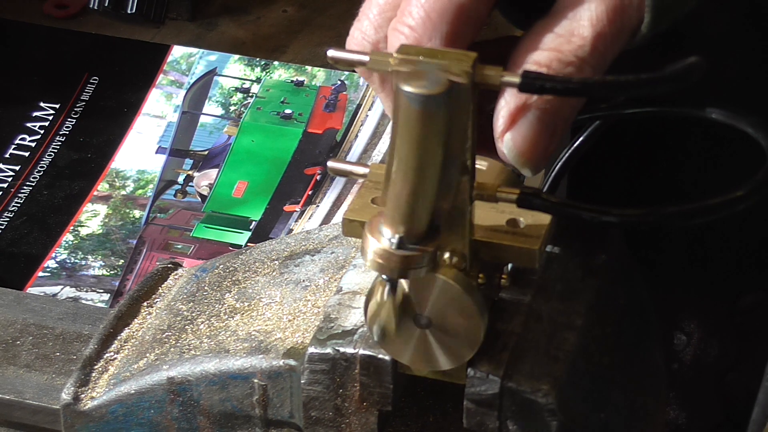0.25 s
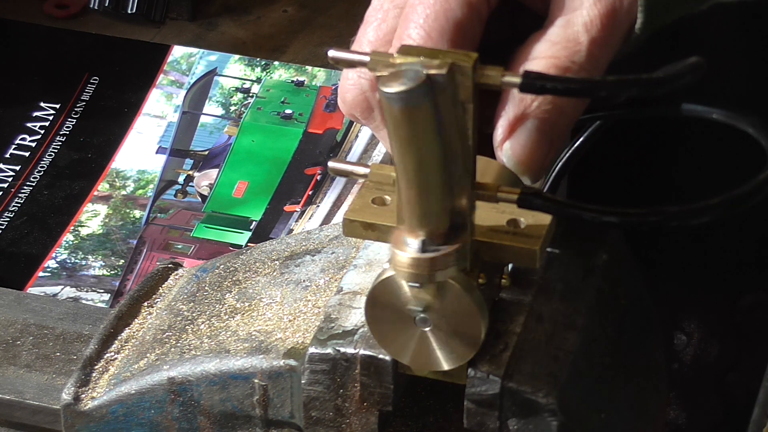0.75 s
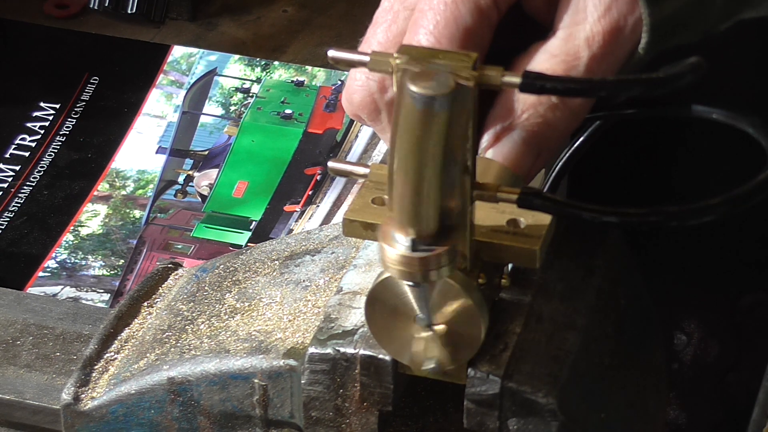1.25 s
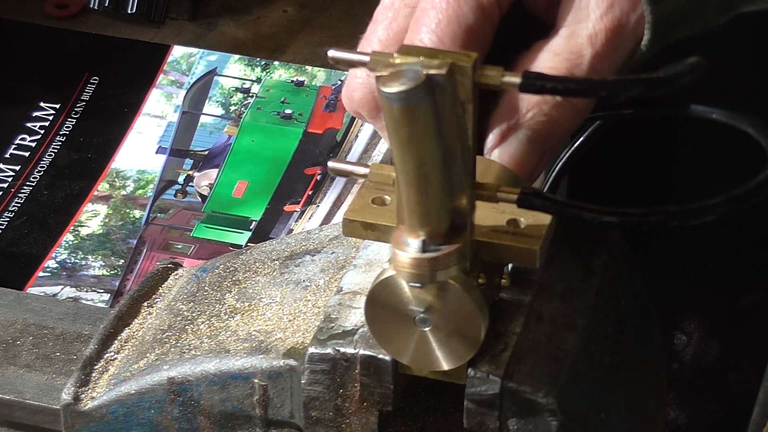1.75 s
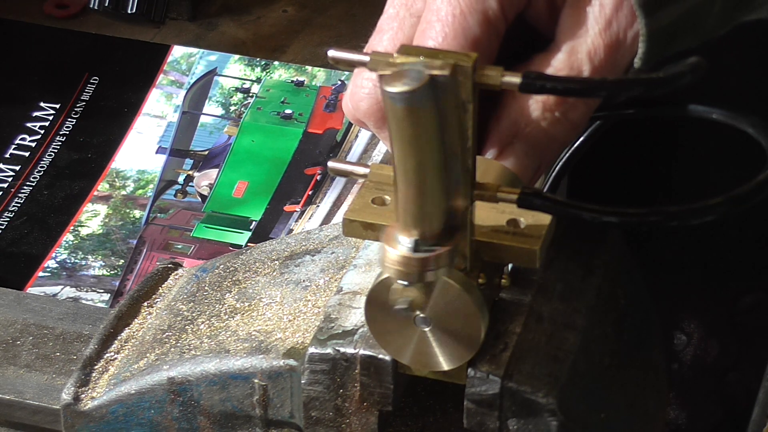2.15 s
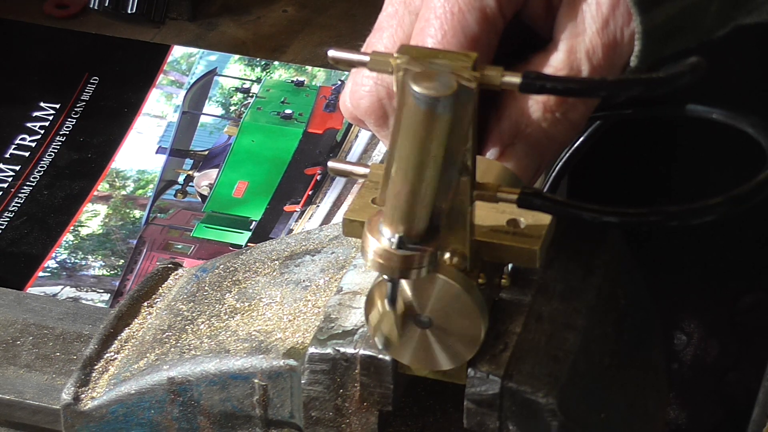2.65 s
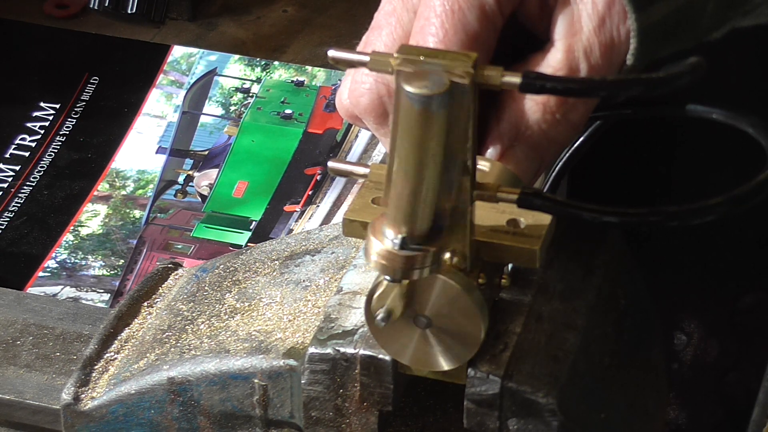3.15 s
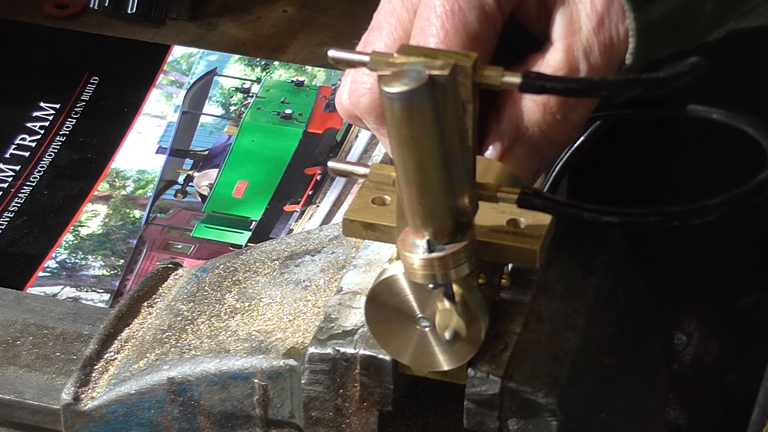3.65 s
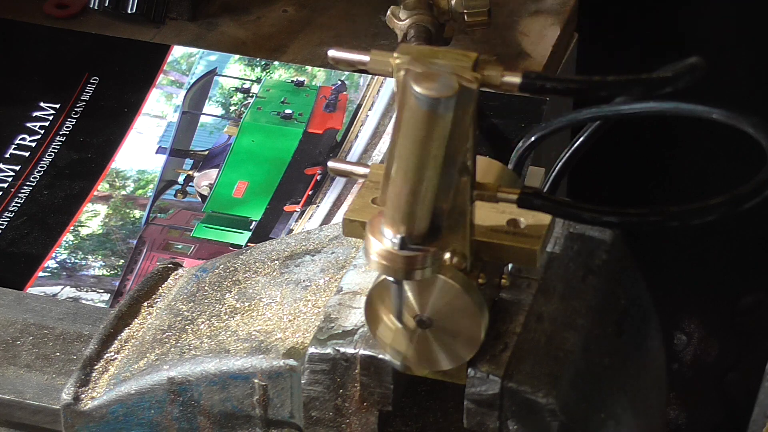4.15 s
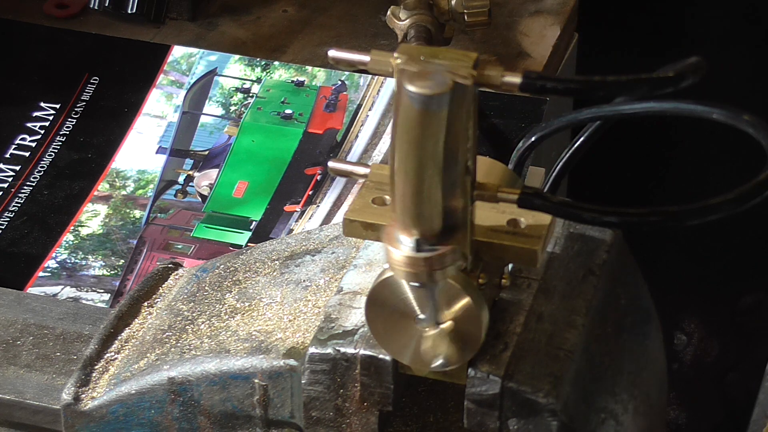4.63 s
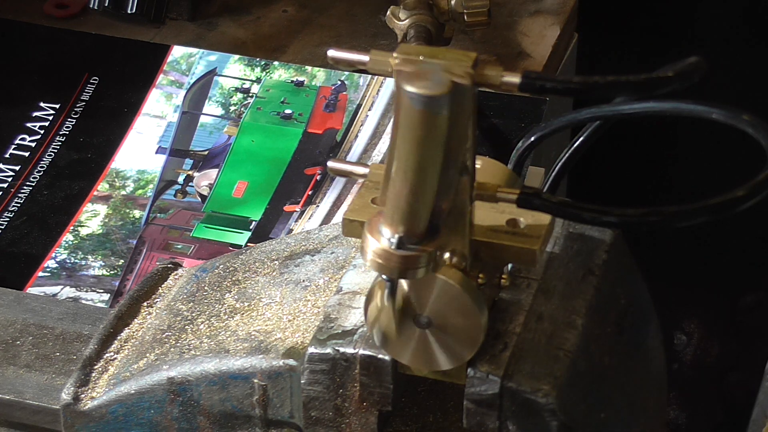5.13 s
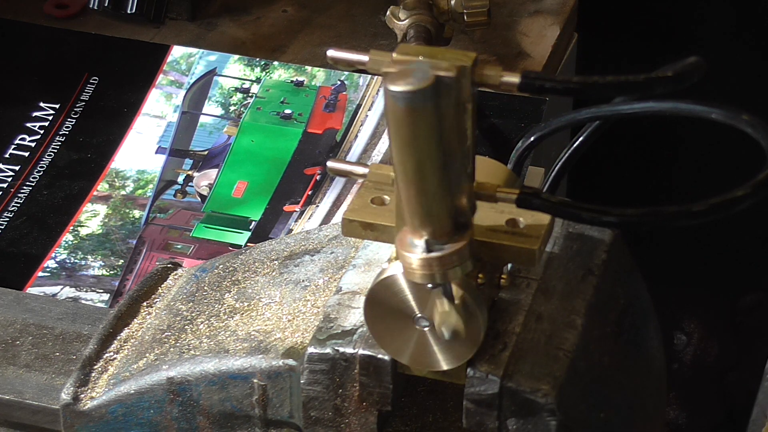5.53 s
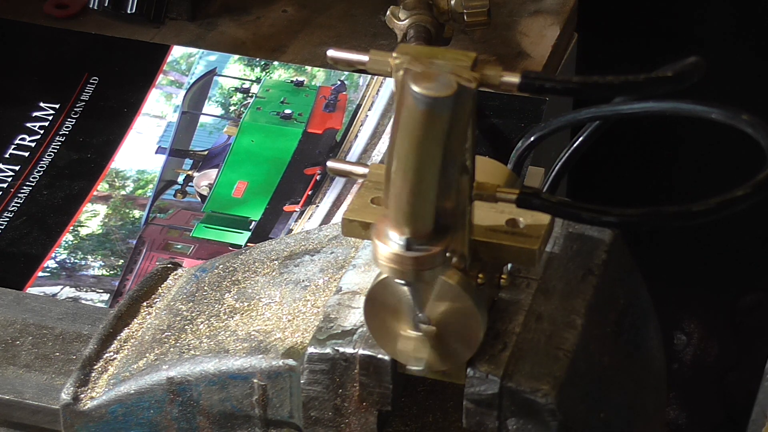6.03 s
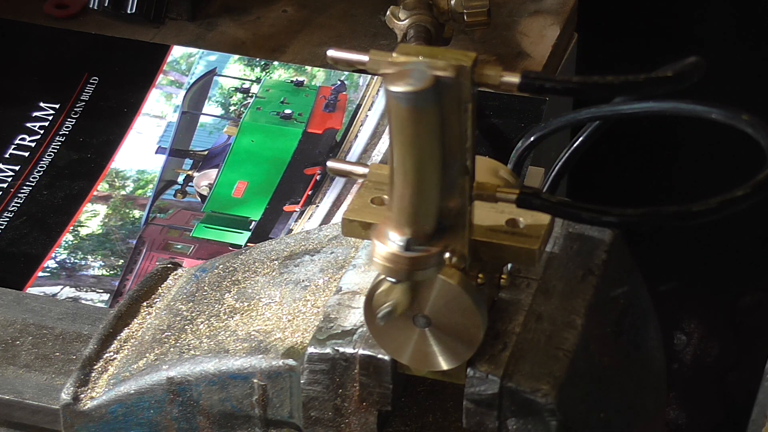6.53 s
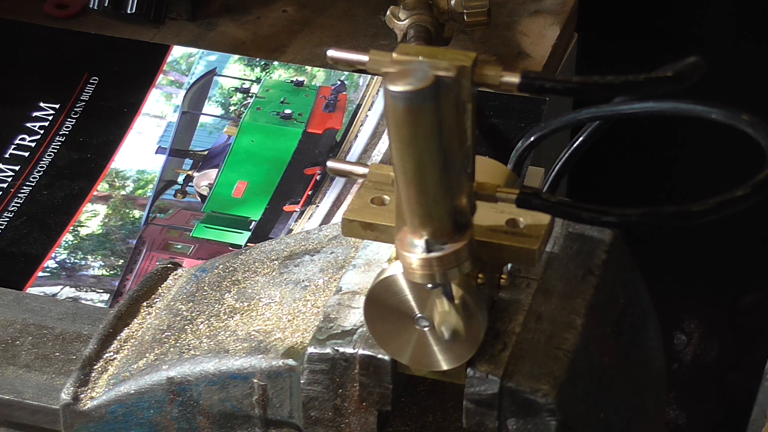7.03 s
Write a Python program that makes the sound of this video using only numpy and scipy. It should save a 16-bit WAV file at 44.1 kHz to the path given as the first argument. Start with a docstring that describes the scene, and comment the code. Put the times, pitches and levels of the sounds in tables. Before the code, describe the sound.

A small brass engine runs on compressed air, heard closely in stereo on a workbench. From 0 s it turns about twenty-one times a second, two sharp hissing chuffs per turn merging into a rapid, raspy flutter over low vice and bench knocks. Loose metal rattles and thin wheezes follow the cycle. A harder spit comes near 0.6 s, and one bright metal click with tiny bounces at 0.8 s. Speed wavers slightly around 1.5 s. From about 2.1 s a hand slows it; the pitch sinks, puffs separate and grow stronger, with ticks, hollow knocks, dull thumps and a soft leaking hiss. By 3.8 s it chugs at half speed. Around 4.0 to 4.2 s it surges back, the rattle easing by 5 s, then runs evenly until the end near 7.3 s, with faint spits around 6.5 and 7.1 s. The room tail is short and the background nearly silent.

```python
"""Small steam engine on a bench

A small double-acting brass steam engine runs on compressed air, clamped in a vice on a workbench.
Each turn gives two chuffs of shaped noise, and a few knocks that ring the resonances of the bench.
A hand slows the engine until it chugs at half speed, then lets it run free again; metal clicks once.
Rattles, ticks, wheezes and hollow tones follow the crank; a short room tail and faint noise surround them."""
import sys
import numpy as np
from scipy import signal
from scipy.fft import rfft, irfft, next_fast_len
from scipy.io import wavfile
from scipy.ndimage import uniform_filter1d, map_coordinates

SR = 44100
rng = np.random.default_rng(int(sys.argv[2]) if len(sys.argv) > 2 else 0)


def unload_audio(sound):
    """Save the sound as a 16-bit wav file, at the path given as the first command line argument."""
    columns = np.transpose(np.atleast_2d(sound))
    # keep every value between -1 and 1, then stretch to whole-number steps
    steps = np.round(np.clip(columns, -1, 1) * 32767)
    wavfile.write(sys.argv[1], SR, steps.astype(np.int16))


N = 321180

# Speed of the crankshaft. Each row: time in seconds, speed in turns a second.
SPEED = [(0.0, 21.762), (0.42, 21.743), (0.5, 20.698), (0.67, 21.928), (1.46, 20.449), (1.65, 21.124),
         (2.03, 21.02), (2.4, 16.955), (2.93, 14.692), (3.1, 13.066), (3.38, 11.573), (3.84, 10.441),
         (3.98, 11.298), (4.04, 15.24), (4.15, 20.328), (4.35, 21.26), (4.65, 21.349), (7.28, 21.317)]
# Air let out in every turn: two chuffs, and the hiss that follows each. Each row: crank angle in turns,
# hiss level in dB, fizz level in dB, opening in turns, decay in seconds, change towards standstill in dB.
PUFFS = [(-.005, -26.5, -30.5, 0.029, 0.0025, 12.5), (.1, -35.5, -63, 0.05, 0.01, -8),
         (0.483, -25.5, -47, 0.024, 0.0066, 9.5), (0.65, -34.5, -60, 0.12, 0.022, -3.5)]
# Colour of the chuffs. Each row: frequency in Hz, level in dB.
HISS = [(300, -28), (1000, -17), (2000, -8.5), (2600, -20), (3300, -15), (4000, -9.5), (5200, -8),
        (6600, -8.5), (7700, -2.5), (8600, 3), (9400, -9), (10800, -16), (13000, -10), (16000, -6.5)]
# Colour of the thin top of the chuffs. Each row: frequency in Hz, level in dB.
FIZZ = [(7000, -62), (11000, -20.5), (13000, 12), (13800, 20), (14800, 17), (15600, 8), (16500, -12.5)]
# The part of the chuffs that differs between the microphones. Each row: frequency in Hz, level in dB.
SCATTER = [(3000, -78), (6000, -72), (8500, -13.5), (11000, 2), (14000, -20)]
# Air pushed through the narrow port at mid-stroke. Each row: crank angle in turns, half length in turns,
# level at 1.5 times the usual speed in dB, change towards standstill in dB.
WHEEZES = [(.235, 0.045, -33.5, -26), (.795, 0.061, -29, -13.5)]
# Colour of that air. Each row: frequency in Hz, level in dB.
WHEEZE = [(2000, -30), (5000, 8.5), (8000, -44), (11000, -24), (13000, -16), (14500, 16.5), (15600, 4),
          (16500, -10)]
# Knocks in every turn. Each row: crank angle in turns, relative level in dB,
# power of the speed that the force follows.
KNOCKS = [(0.017, -5.5, 0.85), (0.16, -6.5, -0.27), (0.518, -9, -.9), (0.632, -2, 0.5),
          (0.843, -7, -0.0039)]
# Resonances of vice and bench. Each row: frequency in Hz, width in Hz, relative level in dB.
BENCH = [(84.8, 2, -11.5), (117.2, 15.8, -11.5), (163, 37.5, -6.5), (179.7, 9, -0.5), (216.1, 14, -5.5),
         (263.5, 22.4, -6), (290.4, 10.3, -7.5), (350, 18, -3.5), (358.3, 67.7, -6.5), (388.5, 24.3, -6),
         (481.6, 13, -18), (612, 25, -21.5), (771, 48, -22.5), (832, 5.7, -13.5), (917.7, 18, -16),
         (1030, 37, -35), (1130.4, 13, -20.5), (1338, 21, -30.5)]
# Sound of the bench that differs between the microphones. Each row: frequency in Hz, level in dB.
SPREAD = [(130, -19), (200, -51), (300, -16.5), (600, -9.5), (1200, -18)]
# Play in the crank pin, taken up after each chuff; loose metal rattles at the same angles.
# Each row: crank angle in turns, relative level of the tick in dB.
TICKS = [(0.092, 7), (.585, 3.5)]
# Colour of the ticks. Each row: frequency in Hz, level in dB.
TICK = [(500, -17), (1400, -12), (2000, 0), (2700, -13), (4500, -11), (6500, -4.5), (8300, 13.5),
        (9500, -3), (13000, -12), (16000, -9)]
# Colour of the loose metal. Each row: frequency in Hz, level in dB.
RATTLE = [(150, -26), (350, 4.5), (470, 0.5), (605, 3.5), (700, 0), (920, 2), (1050, -0.5), (1200, 0),
          (1500, -6.5), (2200, -19), (3000, -15)]
# Chatter of the piston rod. Each row: crank angle in turns, level in free running in dB,
# extra under the hand in dB.
CHATTER = [(.15, -50, 5.5), (.72, -50.5, 3)]
# Colour of the chatter. Each row: frequency in Hz, level in dB.
CLATTER = [(1000, -20), (1600, -27), (2050, 13), (2600, -5), (3300, 5), (4200, 5.5), (6000, -18),
           (9000, -36)]
# Hollow tones of the cylinder and its brass parts, once a turn; the moving piston bends some of them.
# Each row: start in seconds, end in seconds, crank angle in turns, half length in seconds,
# frequency in Hz, glide in Hz per second, relative level in dB.
RINGS = [(0, .9, .7, .011, 770, 0, -43), (0.45, 2.3, .8, .009, 605, 1000, -42),
         (2.15, 2.8, .04, .012, 918, 0, -38), (2.15, 2.8, .7, .005, 890, 0, -38),
         (2.2, 2.85, .05, .012, 275, 0, -37), (2.3, 2.85, .72, .009, 605, 0, -39),
         (2.85, 3.27, .57, .006, 870, 0, -40), (2.85, 3.27, .67, .006, 720, 0, -39),
         (2.8, 3.27, .87, .009, 610, 0, -39), (2.85, 3.65, .14, .005, 860, 0, -39),
         (3.25, 4.2, .27, .012, 605, 0, -42), (3.27, 4.0, .64, .011, 1163, 0, -39),
         (3.27, 4.0, .61, .006, 850, 0, -39), (3.3, 3.85, .87, .006, 840, 0, -40),
         (2.85, 4.4, .68, .008, 605, 0, -41.5), (3.3, 4.05, .21, .011, 270, 9000, -36.5),
         (3.3, 4.05, .34, .01, 320, -8000, -35), (2.85, 3.3, .25, .009, 270, 5000, -38),
         (2.85, 4.05, .68, .009, 240, 4000, -38.5), (4.05, 4.45, .7, .012, 915, 0, -40),
         (4.05, 4.45, .2, .012, 890, 0, -42)]
# Chuffs that spit harder than the rest. Each row: time in seconds, relative level in dB.
SPITS = [(0.627, -17), (2.6042, -26), (2.6972, -22), (2.759, -25), (2.925, -29), (2.9632, -24),
         (3.108, -26), (3.3506, -24), (3.5244, -24), (6.539, -28), (7.145, -23)]
# A metal click and its bounces. Each row: time in seconds, relative level in dB.
CLICKS = [(0.7726, 1), (0.778, -24), (0.7846, -10)]
# Colour of the click. Each row: frequency in Hz, level in dB.
SNAP = [(200, -23), (600, -6), (1000, -3), (1250, 7), (1900, 4), (2600, -7), (3500, -9), (4500, 3),
        (5800, 6.5), (8000, -10), (16000, -35)]
# Heavy strokes of the engine that thump the bench. Each row: time in seconds, relative level in dB.
THUMPS = [(2.115, -36), (2.161, -32), (2.215, -38), (2.364, -30.5), (2.502, -32), (2.562, -30),
          (2.625, -32), (2.689, -32.5), (2.753, -38), (3.021, -33), (3.279, -33.5), (3.36, -33.5),
          (3.719, -34.4), (3.812, -35), (3.867, -32), (3.907, -38), (4.158, -41), (4.202, -36)]
# How fast the workshop falls silent. Each row: frequency in Hz, time to fall by 60 dB in seconds.
ROOM = [(200, 0.053), (2000, 0.23), (8000, 0.14), (15000, 0.12)]
# Colour of the background noise. Each row: frequency in Hz, level in dB.
FLOOR = [(25, -38), (60, 2), (130, 12), (450, 8), (1000, 11), (2700, -41), (8500, -28), (11000, -33),
         (16000, -51)]
# Colour of the microphones. Each row: frequency in Hz, left minus right in dB.
LEAN = [(130, -.6), (290, -1.4), (640, .9), (3000, .7), (7000, -.3), (9000, -.5), (14000, 2.1)]

HAND_OFF_S, SETTLE_S = 4.19, 0.81  # the hand lets go, then its effect fades over this long
LABOUR_SAG = 0.13  # share of speed lost at which the engine labours fully
# loose metal: level in free running, rise under full labour, extra while the hand is on (dB)
RATTLE_DB, RATTLE_LABOUR_DB, RATTLE_HAND_DB = -47, 2.5, 5
RATTLE_FRESH_DB = -1  # part that changes from blow to blow, against the part that repeats
# the knocks come early or late: in free running, and extra from the fingers (s)
FREE_WANDER_S, GRIP_WANDER_S = 0.0001, 0.00024
RING_DETUNE, PORT_DRIFT = 0.022, 0.025  # shifts in pitch of hollow tones and port hiss (shares)
# both ports are covered before each chuff: angle and half length (turns), drop of the hiss (dB)
SHUT_ANGLE, SHUT_TURNS, SHUT_DB = 0.42, 0.045, -4


def amp(db):
    """Turn decibels into a gain."""
    return 10 ** (np.asarray(db) / 20)


def unit(x):
    """Scale to an average (rms) strength of 1."""
    return x / np.sqrt(np.mean(x ** 2) + 1e-20)


def along(points, hz):
    """Read a curve of (Hz, value) points, joined by lines on a log frequency axis."""
    f, v = np.transpose(points)
    return np.interp(np.log(hz + 1), np.log(f + 1), v)


def filtered(x, response):
    """Weigh the frequencies of x by a response."""
    m = next_fast_len(N + SR // 2)
    return irfft(rfft(x, m) * response(np.fft.rfftfreq(m, 1 / SR)), m)[..., :N]


def low_pass(x, top_hz):
    """Let through what lies below a frequency, with a steep slope above it."""
    return filtered(x, lambda hz: 1 / (1 + (hz / top_hz) ** 10))


def noise(spectrum):
    """Make coloured noise of rms 1."""
    return unit(filtered(rng.standard_normal(N), lambda hz: amp(along(spectrum, hz))))


def impulses(times, sizes):
    """Place single pushes at the given times."""
    inside = (times >= 0) & (times < (N - 1) / SR)
    return np.bincount((times[inside] * SR).astype(int), sizes[inside], N)


def struck(pushes, spectrum, size=2048):
    """Turn each push into a short ring of a given colour that starts at once, with unit energy."""
    cepstrum = irfft(np.log(amp(along(spectrum, np.fft.rfftfreq(size, 1 / SR)))))
    # folding the cepstrum leaves no sound ahead of the push
    cepstrum[1:size // 2] *= 2
    cepstrum[size // 2 + 1:] = 0
    ring = irfft(np.exp(rfft(cepstrum)))
    return signal.oaconvolve(pushes, ring / np.linalg.norm(ring))[:N]


def swell_shape(rise, decay):
    """A tenth of a second that swells and dies away, with a peak of 1."""
    t = np.arange(SR // 10) / SR
    shape = (1 - np.exp(-(t / rise) ** 2)) * np.exp(-t / decay)
    return shape / shape.max()


def bursts(pushes, rise, decay):
    """Turn each push into a swell that dies away."""
    return signal.oaconvolve(pushes, swell_shape(rise, decay))[:N]


def wobble(rate):
    """A smooth random curve with this many random points a second."""
    return map_coordinates(rng.standard_normal(4000), [np.arange(N) * rate / SR], mode='mirror')


def crank():
    """Speed in turns a second, turns made so far, and pace as a share of the usual speed."""
    s, turns_a_second = np.transpose(SPEED)
    speed = np.interp(np.arange(N) / SR, s, turns_a_second)
    return speed, np.cumsum(speed) / SR, speed / np.median(speed)


def passes(angle, scatter_db, jitter):
    """Times when the crank passes an angle (jitter in s), the pace then, and a random strength."""
    _, turns, pace = crank()
    clock = np.arange(N) / SR
    times = np.interp(np.arange(int(turns[-1]) + 1) + angle, turns, clock)
    late, strong = rng.standard_normal((len(times), 2)).T
    pace_then = np.interp(times, clock, pace)
    return times + jitter * late, pace_then, amp(scatter_db * strong)


def hand():
    """1 while the hand is on the engine, settling to 0 after release."""
    return np.clip(1 - (np.arange(N) / SR - HAND_OFF_S) / SETTLE_S, 0, 1)


def labour():
    """0 in free running, 1 once the engine is held well below its usual speed."""
    _, _, pace = crank()
    return np.clip((1 - pace) / LABOUR_SAG, 0, 1)


def drifting(x):
    """Shift the resonances of a noise up and down by reading it a little faster or slower."""
    return map_coordinates(x, [np.arange(N) + np.cumsum(PORT_DRIFT * wobble(45))], order=5, mode='mirror')


def exhaust(scatter_db=0.6, flutter_db=1.55, split_hz=6800, colour_db=1.1, soften_db=-5.5):
    """The rocking cylinder uncovers a port and blows down; slow strokes fill it more and chuff harder."""
    speed, turns, pace = crank()
    hiss_power, fizz_power = np.zeros(N), np.zeros(N)
    for angle, hiss_db, fizz_db, opening, decay, slow_db in PUFFS:
        stroke, since = np.divmod(turns - angle + 1, 1)
        chance_db = scatter_db * rng.standard_normal(200)[stroke.astype(int)]
        strength = amp(chance_db + slow_db * (0.5 - pace))
        # the port opens with the crank angle, the pressure falls with time
        swell = strength * (1 - np.exp(-(since / opening) ** 2)) * np.exp(-since / speed / decay)
        swell /= np.percentile(swell, 99)
        hiss_power += (amp(hiss_db) * swell) ** 2
        fizz_power += (amp(fizz_db) * swell) ** 2
    # the oily jet sputters within each chuff
    sputter = amp(flutter_db * unit(uniform_filter1d(rng.standard_normal(N), size=30)))
    # the lower part of the hiss varies and softens at low speed
    body = amp(colour_db * wobble(40) + soften_db * (1 - pace))

    def jet():
        air = drifting(noise(HISS))
        tinted = air + (body - 1) * low_pass(air, split_hz)
        return sputter * (np.sqrt(hiss_power) * tinted + np.sqrt(fizz_power) * noise(FIZZ))

    mid = jet()
    side = filtered(jet(), lambda hz: amp(along(SCATTER, hz)))
    return np.array([mid + side, mid - side])


def wheeze(scatter_db=1.5):
    """The piston drives the spent air out in a thin swell, stronger the faster it runs."""
    _, turns, pace = crank()
    swell = np.zeros(N)
    for angle, length, db, slow_db in WHEEZES:
        away = (turns - angle + 0.5) % 1 - 0.5
        swell += amp(db + slow_db * (1.5 - pace)) * np.exp(-(away / length) ** 2 / 2)
    air = noise(WHEEZE) + 0.12 * np.array([noise(WHEEZE), noise(WHEEZE)])
    return swell * amp(scatter_db * wobble(30)) * air


def shut():
    """Gain of the escaping air: it dips twice a turn, while the cylinder covers both ports."""
    _, turns, _ = crank()
    away = (turns - SHUT_ANGLE + 1 / 4) % 0.5 - 1 / 4
    return amp(SHUT_DB * np.exp(-(away / SHUT_TURNS) ** 2))


def looseness():
    """Gain of the rattle: stronger under the hand and under labour."""
    return amp(RATTLE_DB + RATTLE_HAND_DB * hand() + RATTLE_LABOUR_DB * labour())


def shaken(blows, decay=0.035):
    """Loose metal answers each blow with a dense ring: one part repeats, the other changes."""
    t = np.arange(SR // 10) / SR
    ring = noise(RATTLE)[:len(t)] * np.exp(-t / decay)
    repeating = signal.oaconvolve(blows, ring)[:N]
    fresh = bursts(blows, rise=0.0017, decay=decay) * noise(RATTLE)
    return np.array([unit(repeating), unit(fresh)])


def loose_parts():
    """Loose parts rattle each time the load on the piston reverses; returns the two parts of the ring."""
    parts = np.zeros((2, N))
    for angle, _ in TICKS:
        times, _, strength = passes(angle, scatter_db=2.0, jitter=0.00008)
        parts += shaken(impulses(times, strength))
    return parts


def bench(f, low_hz=74):
    """Response of the bench: a sum of resonances, with little sound given off below low_hz."""
    modes = 0
    for k, (centre, width, db) in enumerate(BENCH):
        # neighbouring resonances push in opposite directions
        mode = 1j * f * width / (centre * centre - f * f + 1j * f * width)
        modes = modes + (-1) ** k * amp(db) * mode
    return modes * f ** 10 / (f ** 10 + low_hz ** 10.)


def knocks(thump_db=23, shake_db=1, held_db=-1.5):
    """Moving parts knock the bench into its resonances, and loose metal shakes it; returns thump, rattle."""
    pushes = np.zeros(N)
    for angle, db, power in KNOCKS:
        times, pace, strength = passes(angle, scatter_db=1.04, jitter=0.00005)
        wander = (FREE_WANDER_S + GRIP_WANDER_S * hand()) * wobble(6)
        times = times + np.interp(times, np.arange(N) / SR, wander)
        pushes += impulses(times, strength * amp(db) * pace ** power)
    repeating, fresh = loose_parts()
    rattle = looseness() * unit(repeating + amp(RATTLE_FRESH_DB) * fresh)
    shake = amp(shake_db) * looseness() * unit(fresh)
    thump = filtered(amp(thump_db + held_db * labour()) * pushes + shake, bench)
    return thump, rattle


def ticks(fast_db=-30):
    """The crank pin snaps across its play, most clearly at low speed."""
    pushes = np.zeros(N)
    for angle, db in TICKS:
        times, pace, strength = passes(angle, scatter_db=0.5, jitter=0.00021)
        pushes += impulses(times, strength * amp(db + fast_db * pace))
    return struck(pushes, TICK)


def clatter(power=2.2, rise=0.0017, decay=0.006):
    """The piston rod chatters in mid-stroke, more at speed and when the hand is on the engine."""
    pushes = np.zeros(N)
    for angle, db, hand_db in CHATTER:
        times, pace, strength = passes(angle, scatter_db=5.0, jitter=0.0019)
        pushes += impulses(times, strength * pace ** power) * amp(db + hand_db * hand())
    return bursts(pushes, rise, decay) * noise(CLATTER)


def hum(order=4, hum_db=-65, slow_db=-30):
    """The unbalanced engine sways the bench, extremely faintly, four times a turn."""
    _, turns, pace = crank()
    return amp(hum_db + slow_db * (4 - pace)) * np.sin(2 * np.pi * order * turns)


def rings(ring_db=-2.0, puff_db=-10):
    """Short hollow tones at set points of the turn, each a little different, the upper in a rough puff."""
    tones, air = np.zeros(N), np.zeros(N)
    t = np.arange(-2000, 2001) / SR
    for start, end, angle, length, hz, glide, db in RINGS:
        times, _, strength = passes(angle, scatter_db=1.0, jitter=0.0008)
        detune, phase = rng.standard_normal((len(times), 2)).T
        for k in np.flatnonzero((times > max(start, t[-1])) & (times < end)):
            swell = amp(db) * strength[k] * np.exp(-(t / length) ** 2 / 2)
            span = int((times[k] + t[0]) * SR) + np.arange(len(t))
            pitch = hz * (1 + RING_DETUNE * detune[k])
            tones[span] += swell * np.cos(2 * np.pi * (pitch * t + glide * t * t / 2 + phase[k]))
            air[span] += swell * (hz > 500)
    return amp(ring_db) * tones + amp(puff_db) * air * noise(RATTLE)


def leak(leak_db=-46.5, top_hz=8800):
    """Pressure backs up behind the slowed piston and escapes past the port face with a dull hiss."""
    return amp(leak_db + 2 * wobble(52)) * labour() * low_pass(noise(HISS), top_hz)


def spits():
    """Now and then a chuff spits sharply: a very short burst of hiss and fizz."""
    times, db = np.transpose(SPITS)
    air = unit(noise(HISS) + 0.52 * noise(FIZZ))
    return bursts(impulses(times, amp(db)), rise=0.00049, decay=0.0016) * air


def click(ring_db=-31):
    """One sharp metal contact that bounces twice and rings briefly."""
    times, db = np.transpose(CLICKS)
    pushes = impulses(times, amp(db))
    ring = bursts(pushes, rise=0.00052, decay=0.019) * noise(SNAP)
    return struck(pushes, SNAP) + amp(ring_db) * ring


def thumps(thump_db=1, body_hz=165, rise=0.0078, decay=0.016):
    """A heavy stroke rocks the bench at one low resonance."""
    times, db = np.transpose(THUMPS)
    t = np.arange(SR // 10) / SR
    boom = swell_shape(rise, decay) * np.sin(2 * np.pi * body_hz * t)
    return signal.oaconvolve(impulses(times, amp(db + thump_db)), boom)[:N]


def workshop(x):
    """A short diffuse tail of fading noise, different at each ear, 130 samples late."""
    hz, t, z = signal.stft(rng.standard_normal((2, SR // 3)), SR, nperseg=256)
    fade = amp(-60 * t / along(ROOM, hz)[:, None])
    tail = signal.istft(z * fade, SR, nperseg=256)[1]
    late = np.pad(x, (130, 0))[None]
    return signal.fftconvolve(late, tail / np.linalg.norm(tail[0]), axes=1)[:, :N]


def scene(room_db=-11, bench_room_db=-22, floor_db=-60):
    """The engine close by, in a quiet workshop."""
    thump, rattle = knocks()
    low = thump + thumps() + hum()
    escaping_air = shut() * (exhaust() + wheeze() + leak())
    bright = escaping_air + spits() + ticks() + rattle + clatter() + rings() + click()
    # the wide bench top reaches the two microphones a little out of phase
    side = filtered(low + rattle, lambda hz: 1j * amp(along(SPREAD, hz)))
    room = workshop(amp(room_db) * bright.mean(axis=0) + amp(bench_room_db) * low)
    floor = amp(floor_db) * np.array([noise(FLOOR), noise(FLOOR)])
    return bright + low + np.array([side, -side]) + room + floor


def record(dry, top_hz=15850):
    """Two microphones of slightly different colour, and nothing above top_hz."""
    return filtered(dry, lambda hz: amp(np.outer([.5, -.5], along(LEAN, hz))) * (hz < top_hz))


dry = scene()
out = record(dry)
unload_audio(out)
```